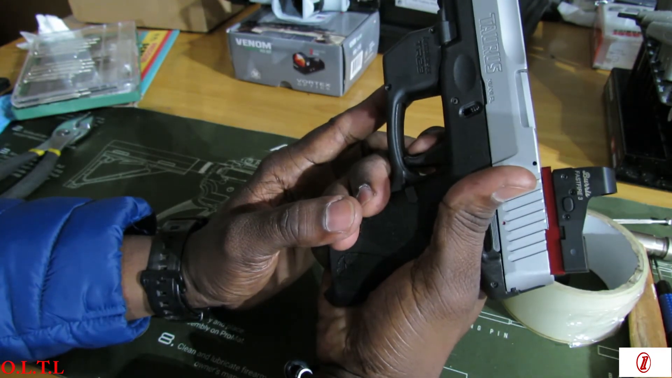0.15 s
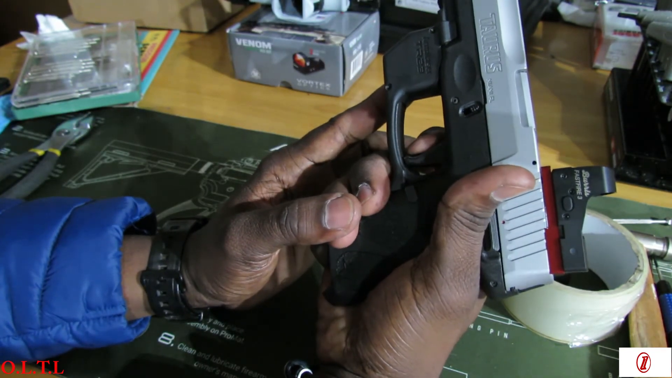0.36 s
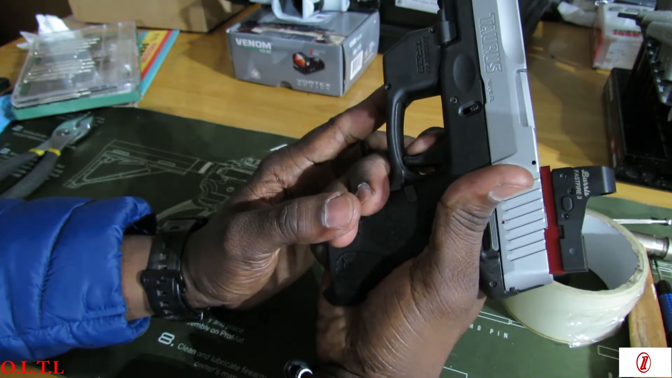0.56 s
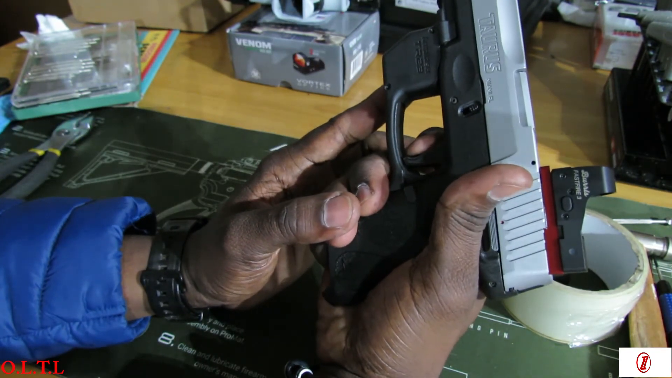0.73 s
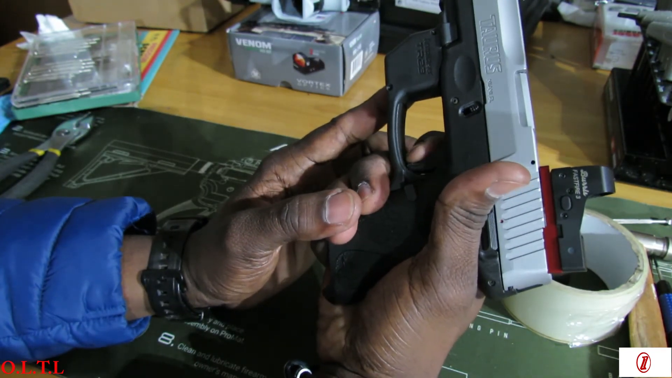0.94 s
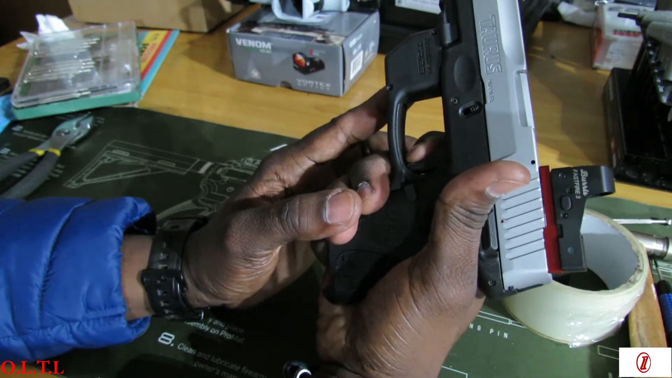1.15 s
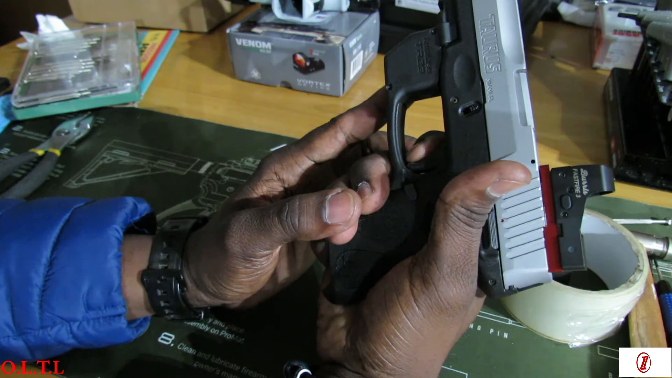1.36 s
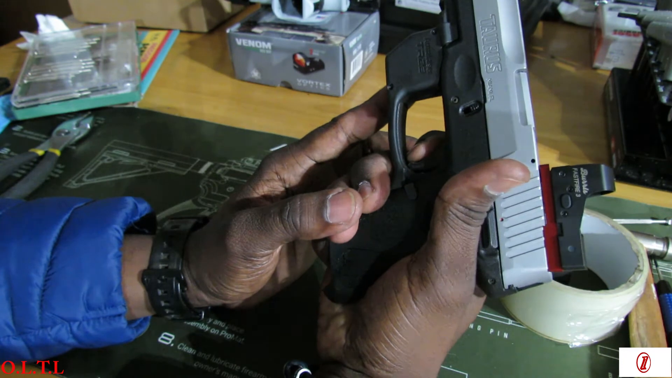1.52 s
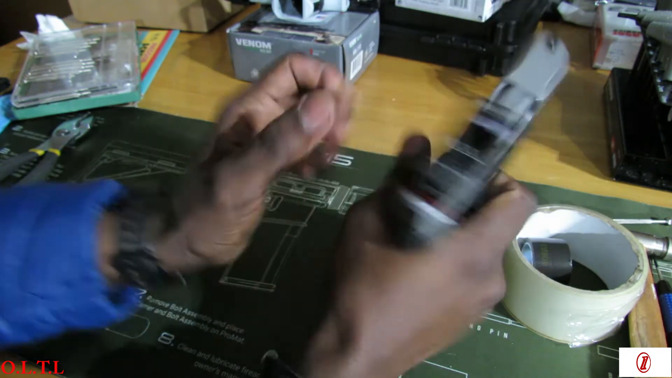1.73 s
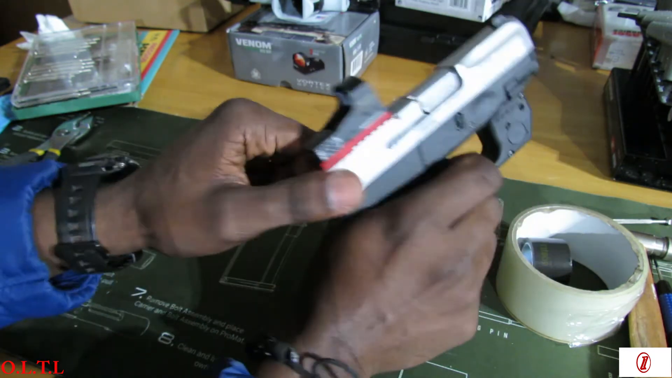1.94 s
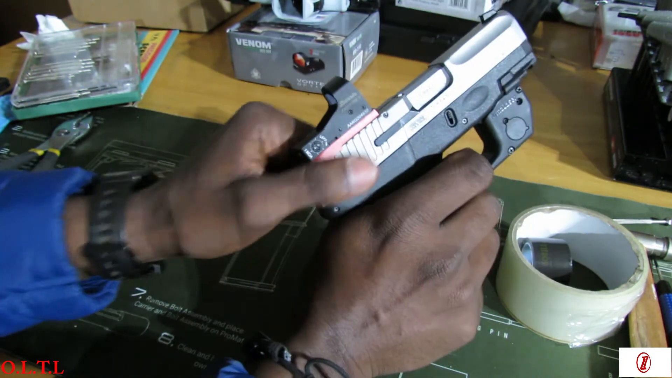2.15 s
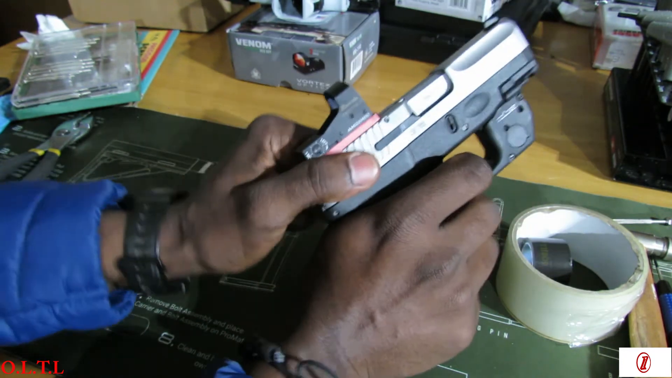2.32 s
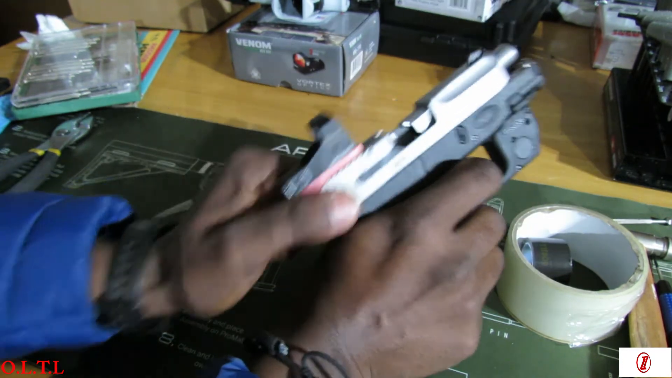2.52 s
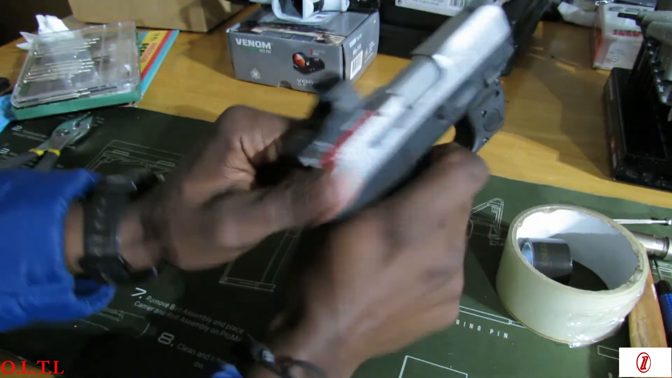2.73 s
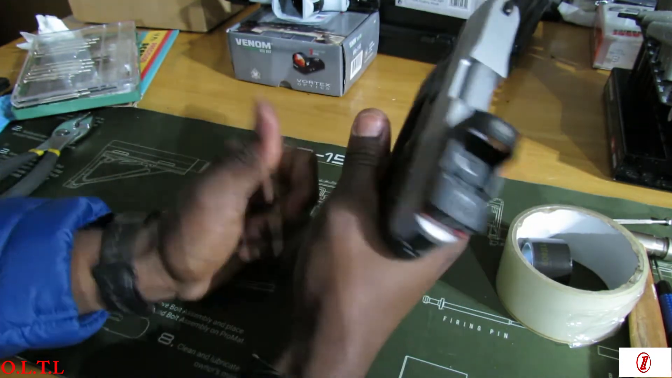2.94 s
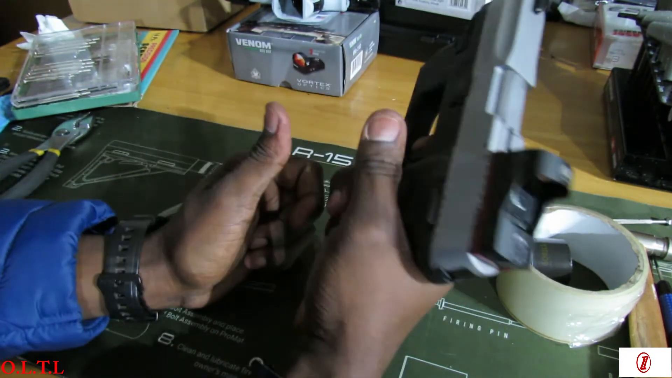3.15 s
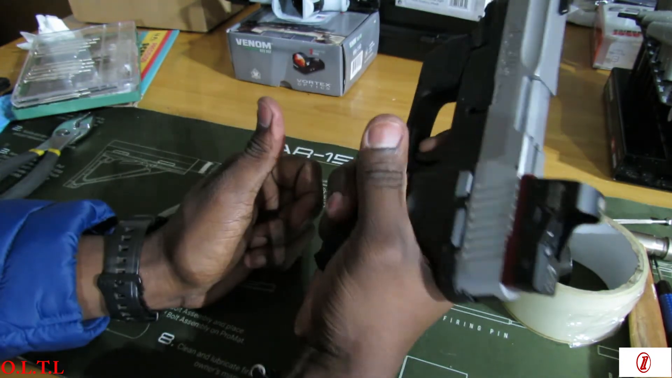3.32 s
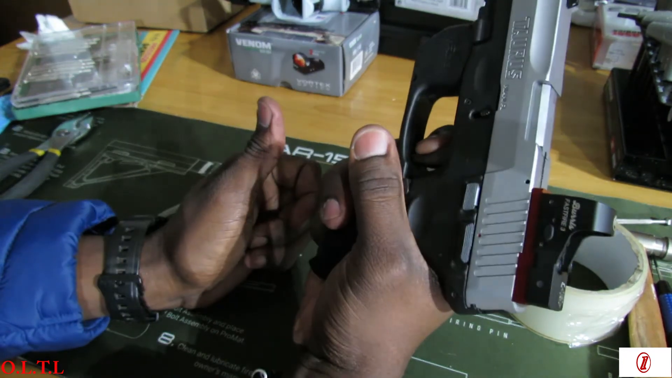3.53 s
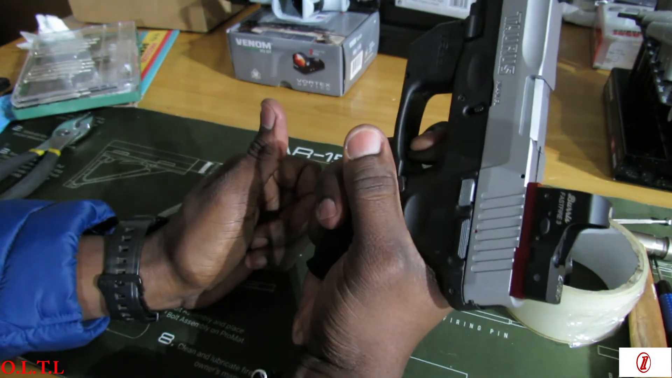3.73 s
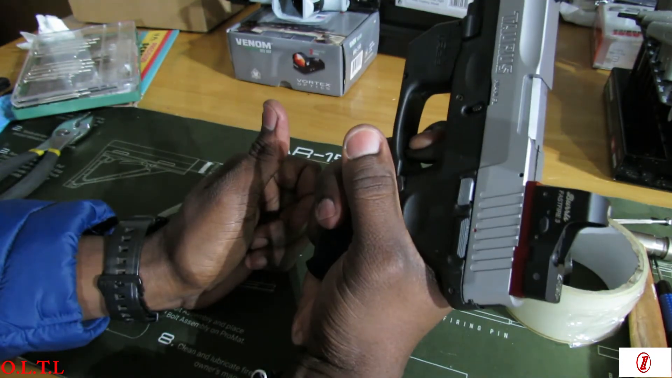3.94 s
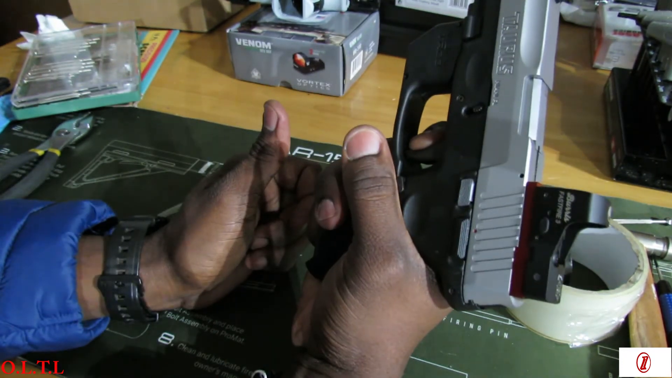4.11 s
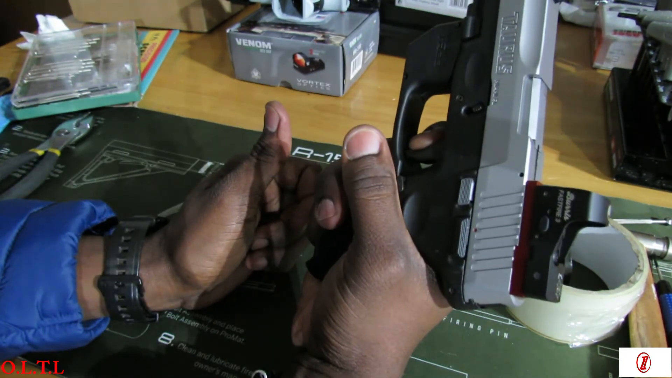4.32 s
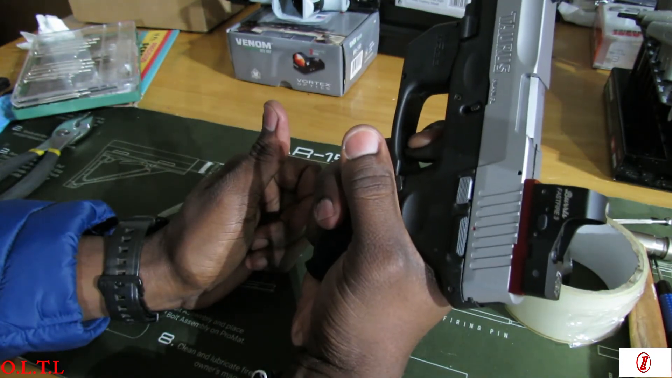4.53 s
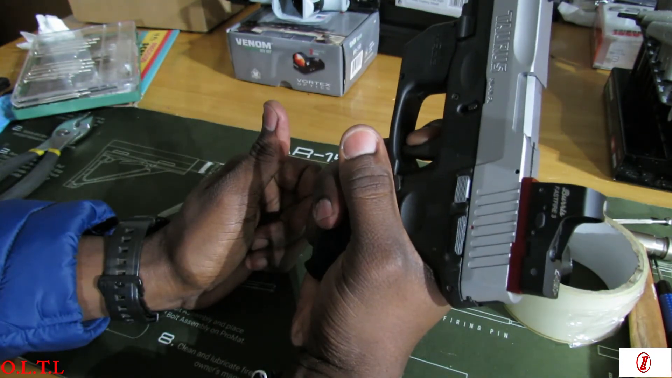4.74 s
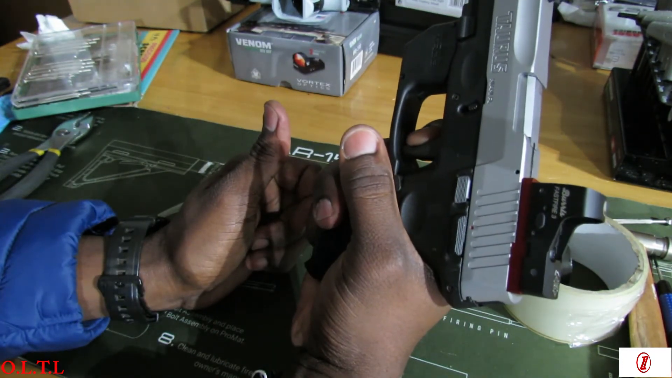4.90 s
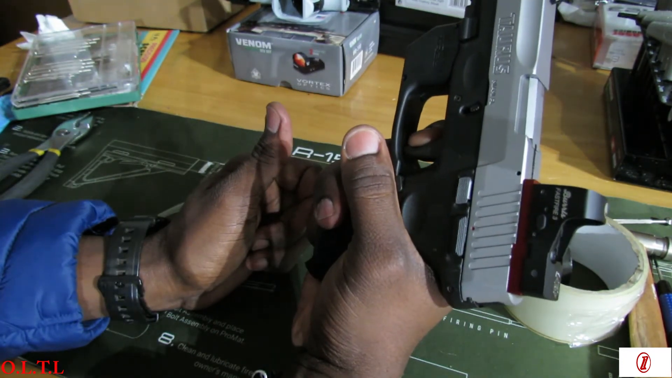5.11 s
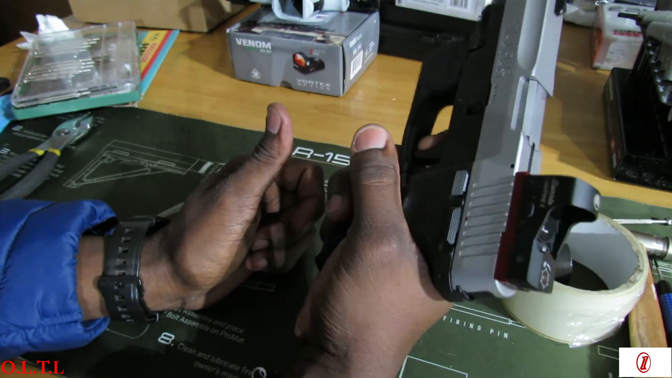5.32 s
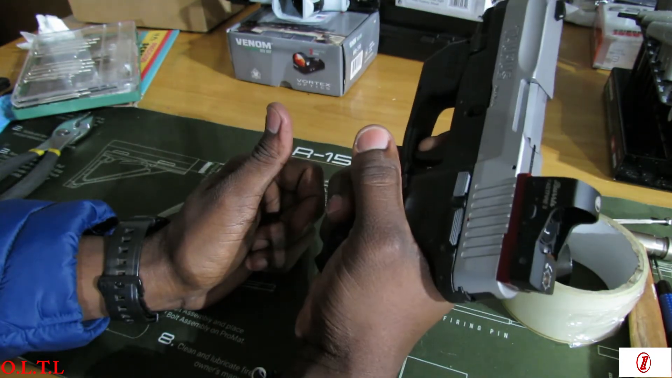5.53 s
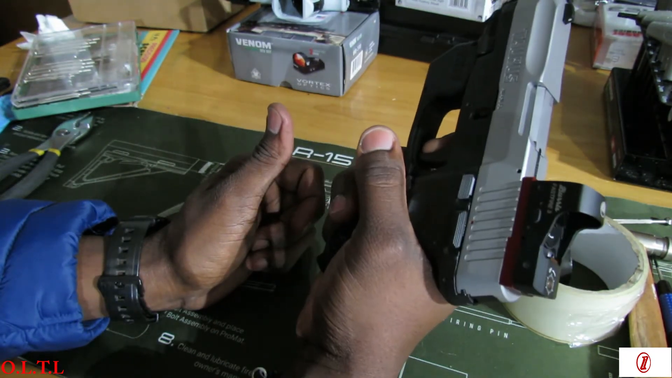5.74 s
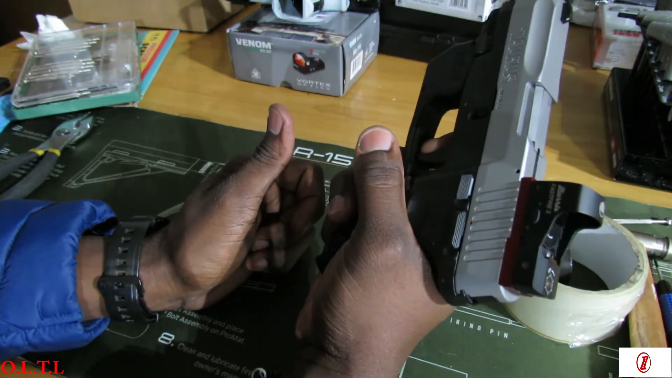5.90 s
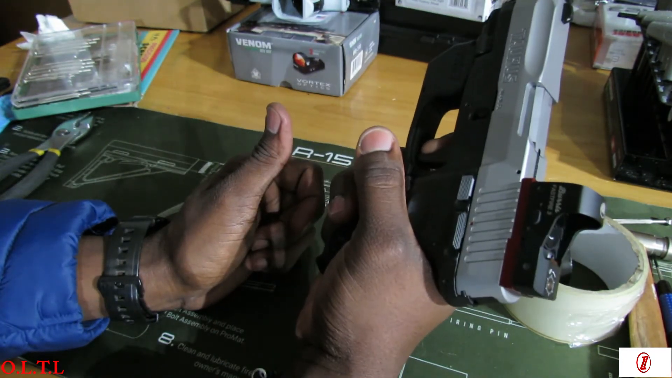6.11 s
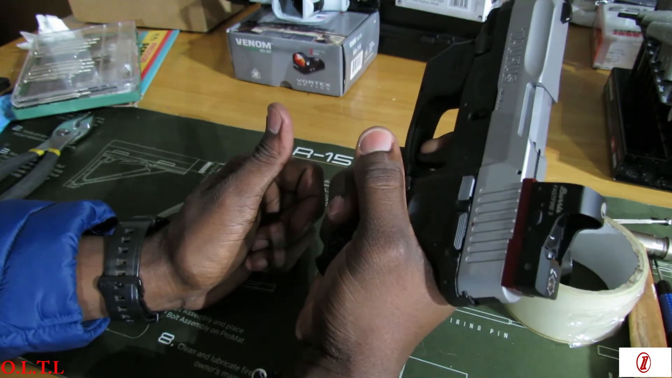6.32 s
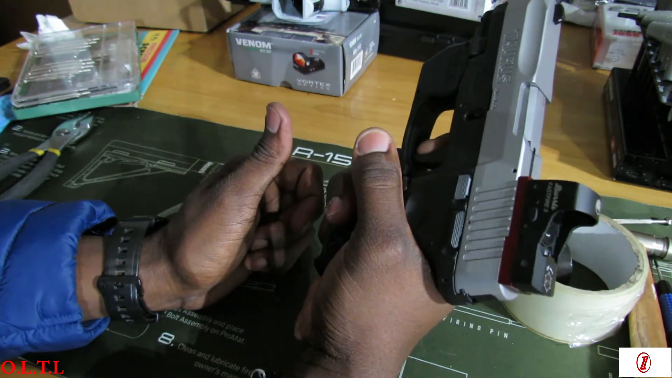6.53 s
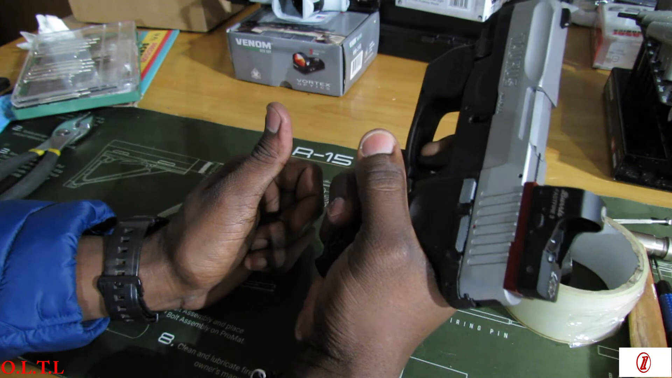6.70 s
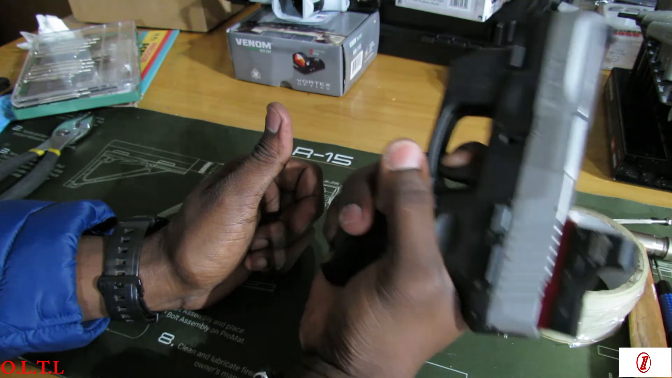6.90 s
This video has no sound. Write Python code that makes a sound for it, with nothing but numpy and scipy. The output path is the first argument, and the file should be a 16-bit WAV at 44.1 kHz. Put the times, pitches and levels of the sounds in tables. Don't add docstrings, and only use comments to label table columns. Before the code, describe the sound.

An unloaded pistol's striker snaps loudly, its slide racks back and slams home, then a fainter click and a crackling nylon sleeve, in a quiet room.

```python
import sys
import numpy as np
from scipy import signal
from scipy.fft import rfft, irfft, next_fast_len
from scipy.io import wavfile
from scipy.ndimage import uniform_filter1d, map_coordinates

SR = 44100
rng = np.random.default_rng(int(sys.argv[2]) if len(sys.argv) > 2 else 0)


def how_loud(loudness_db):
    steps = np.asarray(loudness_db, float) / 20
    return 10 ** steps


def pcm_store(signal):
    levels = np.round(np.clip(np.atleast_2d(signal), -1, 1) * 32767)
    wavfile.write(sys.argv[1], SR, levels.astype(np.int16).T)


N = 306881


def along(points, hz):
    f, v = np.transpose(points)
    return np.interp(np.log(hz + 1), np.log(f + 1), v)


def filtered(x, response):
    m = next_fast_len(x.shape[-1] + 2048)
    spectrum = rfft(x, m) * response(np.fft.rfftfreq(m, 1 / SR))
    return irfft(spectrum, m)[..., :x.shape[-1]]


def wobble(rate):
    knots = rng.standard_normal(int(N * rate / SR) + 4)
    return map_coordinates(knots, [np.arange(N) * rate / SR])


def peaked(x):
    return x / np.abs(x).max()


def add(track, s, sound):
    part = track[..., round(s * SR):][..., :sound.shape[-1]]
    part += sound[..., :part.shape[-1]]


def scuff(t60, size=4096):
    t = np.arange(size) / SR
    attack = 1 - np.exp(-t / 0.00026)
    return rng.standard_normal(size) * attack * how_loud(-60 * t / max(t60, .001))


def ducking():
    # (t/s, depth/dB, hold/s, recovery/s)
    ducks = [
        (0.86, 18, .55, 0.44),
        (2.5, 15.5, 0.11, .6),
        (2.7, 16.5, 0.36, 1.36),
        (4.66, 8, 0.047, 0.972),
    ]
    sink_db = 1
    losses = []
    for s, depth_db, hold, recovery in ducks:
        after = np.arange(N) / SR - s
        creep = depth_db * np.exp(-np.maximum(after - hold, 0) / recovery)
        sink = sink_db * np.clip(1 - after / hold, 0, 1)
        losses.append((after > 0) * (creep + sink))
    return np.max(losses, axis=0)


def hum():
    # (f/Hz, level/dB per Hz)
    hum_colour = [(12, -37.5), (20, -5.5), (44, -3.5), (90, -4), (123, -3.5), (268, -5), (355, -6),
                  (554, -8), (819, -9), (1080, -10.5), (1280, -12), (2060, -17.5), (6120, -25),
                  (13400, -29.5), (15800, -37)]
    # (f/Hz, correlation)
    likeness = [(60, -0.1), (130, -0.1), (290, -0.63), (640, -0.39), (1410, -0.28), (3100, 0.34),
                (6820, 0.32), (15000, 0.05)]
    # (f/Hz, width/Hz, level over the hum/dB)
    fan_lines = [(119.67, 3.3, 0.5), (690, 9, -5.5)]
    open_gain_db = -61.5
    whistle_hz, whistle_drift_hz, whistle_db = 832, 9, -8

    def mid_side(hz):
        lines = sum(how_loud(db) / (1 + ((hz - centre) / width) ** 2) for centre, width, db in fan_lines)
        turn = np.arccos(np.clip(along(likeness, hz), -1, 1)) / 2
        return how_loud(along(hum_colour, hz)) * (1 + lines) * [np.cos(turn), np.sin(turn)]

    mid, side = filtered(rng.standard_normal((2, N)), mid_side)
    scale = np.std(filtered(mid, lambda hz: (hz > 60) & (hz < 500)))
    level = open_gain_db - uniform_filter1d(ducking(), size=800) + 0.27 * wobble(19.0)
    turns = np.cumsum(whistle_hz + whistle_drift_hz * wobble(7.3)) / SR
    whistle = how_loud(whistle_db + 1.4 * wobble(3)) * np.sin(2 * np.pi * turns)
    return how_loud(level) * (np.array([mid + side, mid - side]) / scale + whistle)


def rustle():
    # (f/Hz, level/dB per Hz)
    cloth_colour = [(120, -54.5), (200, -10.5), (423, -5), (490, -6.5), (879, -3), (2890, -2.5),
                    (7070, -1.5), (10200, -7.5), (12500, -4.5), (15800, -7)]
    # (peak t/s, peak level/dB, 20 dB rise/ms, 20 dB fall/ms, brightness/dB)
    sleeve = [(1.95, -62, 179.5, 599.5, -2.5), (2.2, -60, 109.5, 400, 2), (2.35, -62, 202, 250.5, -4),
              (3.156, -70.5, 59.5, 170, -4), (4.452, -70, 118, 149.5, 0.5), (5.79, -69.5, 99.5, 500, -3),
              (6.11, -60, 75, 300, -1.5), (6.22, -48.5, 138, 419.5, 2), (6.32, -47.5, 191, 400.5, 1.5),
              (6.45, -54.5, 90, 145, -1.5), (6.542, -57, 13, 53, -3), (6.74, -62.5, 196, 800, -1)]
    hands = [
        (1.617, -61.5, 7.6, 130, -8.5),
        (1.69, -65.5, 49, 200, -3),
        (1.77, -50, 100.1, 330, -6.5),
        (2.445, -51.5, 40, 30, -7.5),
        (3.314, -66.5, 32, 140, -12),
        (3.6, -69, 47, 300, -7.5),
        (4.56, -70.5, 70, 50, -7),
        (6.03, -68.5, 200, 100, -6),
        (6.95, -60.5, 400, 800, -12),
    ]
    sleeve_left_db, hands_left_db = 7, 1.5
    slips = rng.standard_normal((2, N)) * how_loud(1.4 * wobble(700) + 0.68 * wobble(60) + 0.76 * wobble(18))
    slips[1] = .95 * slips[1] - .3 * slips[0]
    cloth = filtered(slips, lambda hz: how_loud(along(cloth_colour, hz)))
    dull = filtered(cloth, lambda hz: 1 / (1 + (hz / 10000) ** 12))
    scale = np.std(filtered(cloth[0], lambda hz: (hz > 1500) & (hz < 8000)))
    ms = np.arange(7000)
    power = np.zeros((4, len(ms)))
    for strokes, left_db in (sleeve, sleeve_left_db), (hands, hands_left_db):
        pan_db = np.array([[left_db / 2], [-left_db / 2]])
        for s, db, rise_ms, fall_ms, bright_db in strokes:
            late = ms - s * 1000
            swell_db = db + 1.0 - 20 * np.where(late < 0, (late / rise_ms) ** 2, late / fall_ms)
            power += how_loud(swell_db + np.vstack([pan_db, bright_db + pan_db])) ** 2
    gain = np.array([np.interp(np.arange(N) / SR * 1000, ms, np.sqrt(row)) for row in power])
    return (gain[:2] * dull + gain[2:] * (cloth - dull)) / scale


def ticks():
    # (t/s, peak level/dB, f/Hz, t60/s, left-right/dB)
    creaks = [(0.5365, -49, 2057, 0.033, -7), (1.6124, -50, 2160, 0.031, -4.5),
              (1.6218, -50, 2020, 0.02, -8), (2.1997, -51, 2524, .02, 14), (2.245, -48.5, 2595, .011, 11),
              (2.9667, -50, 1300, 0.012, 0.5), (3.3114, -49, 2220, .04, 0), (3.322, -54.5, 2200, .05, 0),
              (3.588, -58, 3920, 0.22, 0.5), (3.593, -57, 2420, 0.11, -1), (3.641, -58, 2365, 0.2, 2),
              (5.2891, -47, 1950, 0.029, -4.5), (5.308, -51.5, 5790, 0.0051, 2)]
    # (t/s, peak level/dB)
    creases = [(4.5804, -48.5), (2.981, -50.5), (3.1662, -56), (4.4148, -49.5), (4.4557, -46.5),
               (4.4647, -50.5), (5.987, -51), (6.0769, -44.5), (6.3003, -32), (6.3146, -34.5),
               (6.4229, -39.5), (6.5404, -39.5)]
    # (t/s, peak level/dB)
    fibres = [(0.7846, -53), (2.1329, -50), (2.2077, -42), (2.2804, -52), (2.3401, -52), (2.9982, -54),
              (3.5781, -48.5), (3.6168, -44), (3.7106, -56), (4.1184, -53.5), (4.3957, -53), (4.5804, -39),
              (5.9005, -56), (6.05, -47.5), (6.3396, -38), (6.6735, -44.5), (6.7231, -47), (6.737, -50),
              (6.8085, -45), (6.9125, -47)]
    # (t/s, peak level/dB, f/Hz, t60/s)
    thuds = [
        (0.8499, -13, 955, 0.011),
        (.859, -31, 895, 0.0074),
        (1.750, -39, 330, 0.02),
        (2.4675, -31.5, 802, 0.0079),
        (2.4983, -32, 1015, 0.012),
        (2.692, -24.5, 702, .012),
        (2.9669, -49, 150, 0.054),
        (2.994, -58, 148.7, 0.055),
        (6.908, -47, 114, 0.077),
        (6.941, -45, 152, 0.13),
    ]
    crackle_t60 = .007
    crackles = []
    for snaps, hz, left_db in (creases, 6700, 13.5), (fibres, 13700, 6.5):
        for s, db in snaps:
            crackles.append((s, db, hz * (1 + .08 * rng.normal()), crackle_t60, left_db))
    out, t = np.zeros((2, N)), np.arange(SR // 5) / SR
    for s, db, centre_hz, t60, left_db in [*creaks, *crackles]:
        width = centre_hz * min(.45, np.sqrt(.012 / t60))
        band = lambda f: (1j * f * width / (centre_hz ** 2 - f * f + 1j * f * width)) ** 1.5
        add(out, s, peaked(filtered(scuff(t60), band)) * how_loud(db + left_db * np.array([[.5], [-.5]])))
    for s, db, hz, t60 in thuds:
        push = how_loud(db - 60 * t / t60) * (1 - np.exp(-t / 0.0012))
        add(out, s, push * np.sin(2 * np.pi * hz * t))
    return out


def room(x):
    # (f/Hz, t60/s)
    decay = [(200, .1), (700, .25), (1500, 0.83), (3000, 0.62), (6000, 0.52), (10000, .38), (15000, 0.32)]
    # (f/Hz, level/dB)
    reverb_colour = [(150, -11.5), (800, -2.5), (1500, -3), (2500, -4), (4000, 1), (6000, 0), (8000, -3),
                     (11000, -6.5), (14000, -8.5), (16000, -8.5)]
    out, step = np.zeros((2, N)), SR // 2
    for start in range(0, N, step):
        noise = rng.standard_normal((2, SR // 2))
        part = x[None, start:start + step]
        if np.abs(part).max() > 1e-5:
            hz, t, z = signal.stft(noise, SR, nperseg=256)
            fade_db = along(reverb_colour, hz)[:, None] - 60 * t / along(decay, hz)[:, None]
            tail = signal.istft(z * how_loud(fade_db), SR, nperseg=256)[1]
            wet = signal.fftconvolve(part, tail / np.linalg.norm(tail[0]), axes=1)
            add(out, start / SR + 0.0033, wet)
    return out


def blow(t60):
    force = .55 * scuff(t60)
    force[8] += 2
    return force


def ring(force, modes):
    t = np.arange(len(force)) / SR
    body = np.zeros(len(t))
    for k, (hz, db, t60) in enumerate(modes):
        decay = how_loud(db + rng.normal(0, 2) - 60 * t / t60)
        body += (-1) ** k * decay * np.sin(2 * np.pi * hz * t)
    return peaked(signal.fftconvolve(force, body)[:len(t)])


def blurred(sound):
    power = uniform_filter1d(uniform_filter1d(np.abs(rfft(sound)) ** 2, size=180), size=180)
    return np.roll(irfft(np.sqrt(np.abs(power))), 64)[:256]


def pistol():
    # (t/s, frame level/dB, barrel level/dB, small steel level/dB)
    first_click = [
        (0.847, -22.5, -26, -29.5),
        (0.8503, -4.5, -10, -4.5),
        (0.8522, -11, -14.5, -6.5),
        (0.8531, -13.5, -2.5, 3.5),
        (0.8592, -20, -18.5, -3.5),
        (0.8646, -16.5, -23, -4.5),
        (0.8695, -24, -23, -22),
        (0.876, -29, -35, -31.5),
    ]
    second_click = [
        (4.6522, -20.5, -11.5, -1),
        (4.6533, -21.5, -18, -6),
        (4.6563, -26, -23, -19),
        (4.6606, -34, -26, -30),
        (4.6639, -18, -25, -20.5),
        (4.668, -32, -29.5, -28),
        (4.676, -46.5, -45, -39),
    ]
    pull = [
        (2.4495, -23, -29.5, -36.5),
        (2.4527, -19.5, -35.5, -41),
        (2.4655, -16.5, -25.5, -26),
        (2.4671, -7.5, -5, -0.5),
        (2.481, -18.5, -25, -30.5),
        (2.497, -5, -16.5, -15),
        (2.5005, -5, -11.5, -5),
        (2.5312, -32, -27, -15),
        (2.5311, -12, -16.5, -2.5),
    ]
    release = [(2.6666, -17.5, -30, -17), (2.669, -27, -33, -14.5), (2.6848, -21.5, -17, -12),
               (2.6888, -16, -16.5, -8.5), (2.6906, -12.5, -13, -8.5), (2.693, -21.5, -6, 4),
               (2.694, -6.5, -13, -8), (2.7015, -18, -23, -8), (2.713, -27.5, -9.5, -13.5),
               (2.715, -21, -25, -4.5), (2.7169, -22, -27, -13.5)]
    # (t/s, ring level/dB)
    slams = [
        (2.5012, -12.5),
        (2.6648, -27.5),
        (2.669, -27.5),
        (2.6897, -11.5),
        (2.6925, -12),
        (2.7003, -18),
        (2.7165, -28),
    ]
    frame_first = [(1270, -14, .04), (2180, -1, .007), (2750, -3, .006), (3160, -14, .07), (3200, -3, .005),
                   (3700, -6, .004), (4200, -9, .004)]
    frame_racked = [(1200, -15, .02), (2000, -2, .005), (2400, -4, .007), (2850, -2, .005),
                    (3500, -3, .004), (4200, -6, .004), (2480, -25, .08)]
    frame_turned = [(1400, -14, .008), (2230, 0, .016), (2900, -3, .005), (3800, -8, .004),
                    (2300, -20, .09)]
    striker_first = [(8200, -4, .008), (9000, -6, .005), (9800, -3, .006), (10600, -3, .005),
                     (11700, 0, .008), (12150, -9, .012), (14200, -11, .004)]
    striker_turned = [(4700, -7, .006), (8950, -8, .005), (10500, 0, .004), (11800, 1, .004),
                      (13700, -10, .004), (15200, -14, .003)]
    barrel = [(4750, -2, .005), (5500, -2, .004), (6300, -1, .004), (7300, 0, .004)]
    rails = [(8700, -3, .004), (9900, -4, .004), (11500, 0, .004), (13400, -5, .004), (15300, -5, .003)]
    slide = [(8880, -5, .03), (9040, 0, .03), (9200, -6, .025), (9050, -34, .35)]
    rack_t60 = .006

    rack = np.array([*pull, *release])
    rack = np.concatenate([rack, rack + np.array([0.0091, -14.5, -15.5, -25])])
    actions = [  # contacts, frame, small steel, contact t60/s, room level/dB
        (first_click, frame_first, striker_first, .0058, -4),
        (second_click, frame_turned, striker_turned, .0038, 2.5),
        (rack, frame_racked, rails, rack_t60, .1)]
    out = np.zeros((4, N))
    for contacts, frame, steel, t60, room_db in actions:
        for k, (s, frame_db, barrel_db, steel_db) in enumerate(contacts):
            force = blow(t60)
            snap = peaked(np.diff(force, prepend=0))
            sound = how_loud(frame_db) * ring(force, frame) + how_loud(barrel_db) * ring(force, barrel)
            sound += how_loud(steel_db) * (ring(force, steel) + .25 * snap)
            add(out[0], s, sound)
            path = out[1 + k % 3]
            add(path, s, how_loud(room_db - 2.5) * blurred(sound))
            add(path, s, how_loud(room_db - 10.5) * sound)
    for s, db in slams:
        add(out[:2], s, how_loud([[db], [db - 2]]) * ring(blow(rack_t60), slide))
    steepness = np.array([[5], [2.2], [2.2], [2.2]])
    return filtered(out, lambda hz: (1j * hz / (1150 + 1j * hz) + 1e-9) ** steepness)


def ports(x, around):
    # (f/Hz, left-right/dB)
    lean = [(200, -3.5), (700, -1), (1500, -3), (2500, -6.5), (4400, -0.5), (8000, -3.5), (15000, -1)]
    side, lag_s = np.array([[.5], [-.5]]), .9 / SR
    direct = filtered(x, lambda hz: how_loud(side * along(lean, hz)) * np.exp(-2j * np.pi * hz * side * lag_s))
    bench = np.array([scuff(.03, size=2048), scuff(.04, size=2048)])
    echoes = signal.fftconvolve(around[None], bench / np.linalg.norm(bench[0]), axes=1)[:, :N]
    return direct + how_loud(-9) * echoes


def scene():
    gun, *around = pistol()
    small = ticks()
    tails = how_loud(-14.5) * sum(map(room, around)) + how_loud(-17.5) * room(small.mean(0))
    quiet = filtered(tails + small + rustle() + hum(), lambda hz: hz < 15900)
    return how_loud(0.96) * ports(gun, sum(around)) + quiet


def band_limit(x):
    return signal.sosfilt(signal.butter(12, 16630, fs=SR, output="sos"), x)


def record(dry):
    thump = filtered(dry ** 2, lambda hz: (1j * hz / (90 + 1j * hz)) ** 4 / (1 + 1j * hz / 900))
    clipped = np.clip(filtered(dry, lambda hz: hz < 16700), -1, 1)
    heard = clipped - how_loud([[-23], [-29]]) * thump
    mix = filtered(heard, lambda hz: 1j * hz / (35 + 1j * hz))
    return band_limit(mix)


dry = scene()
out = record(dry)
pcm_store(out)
```